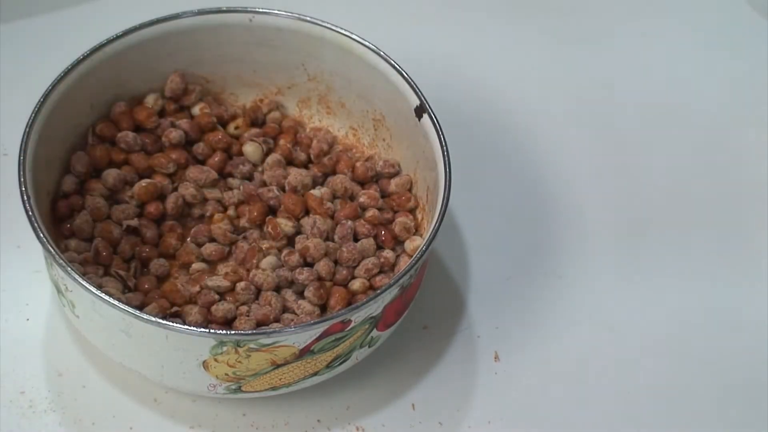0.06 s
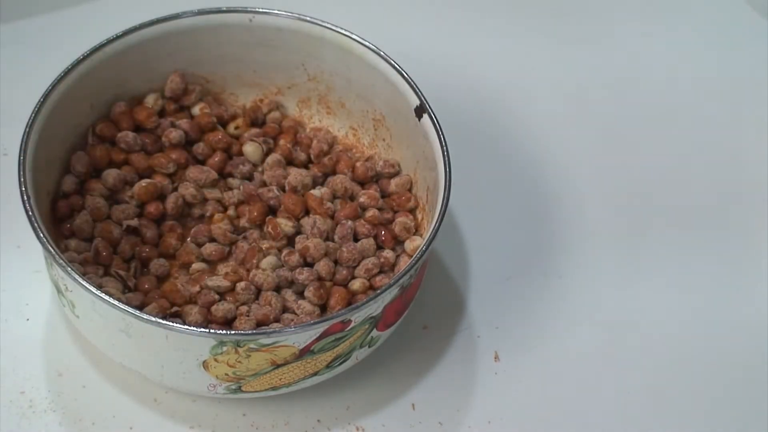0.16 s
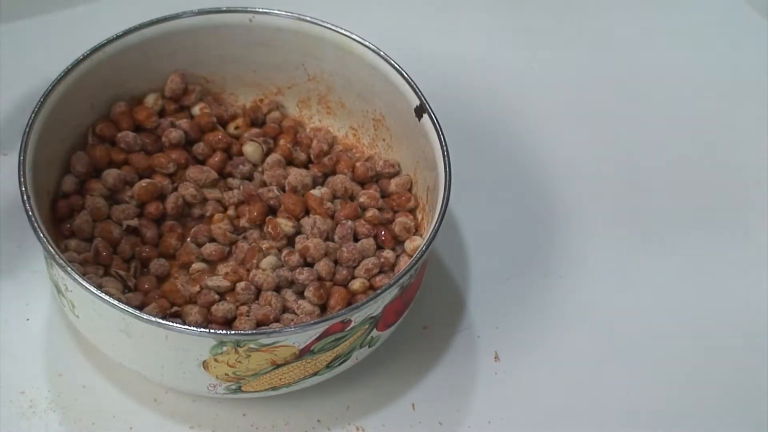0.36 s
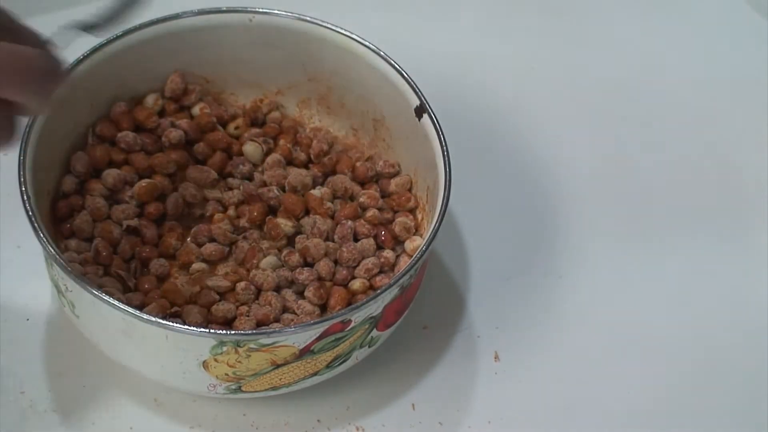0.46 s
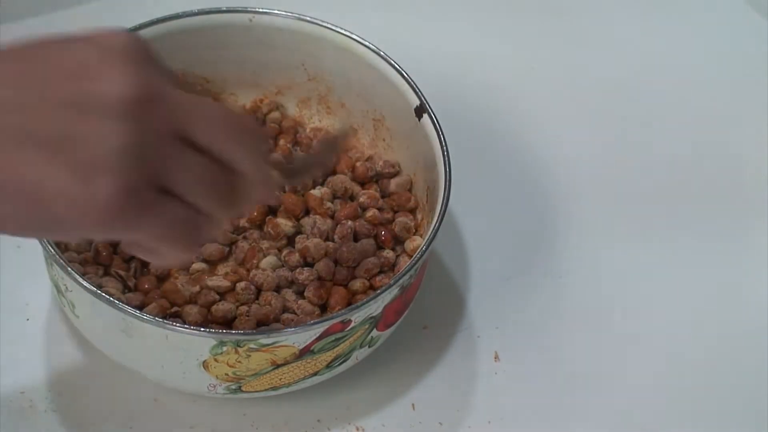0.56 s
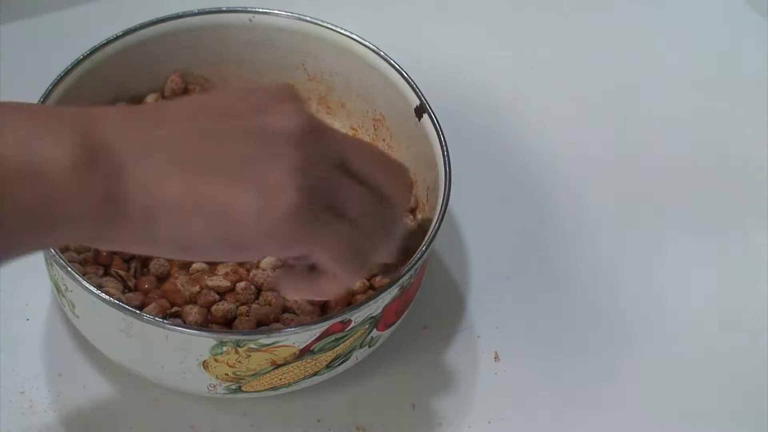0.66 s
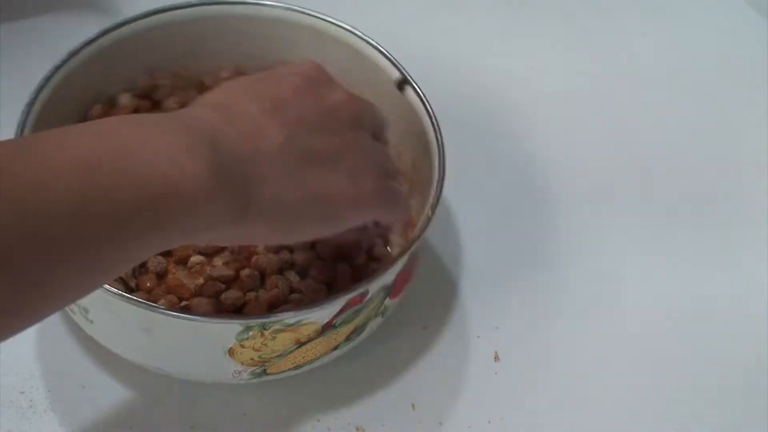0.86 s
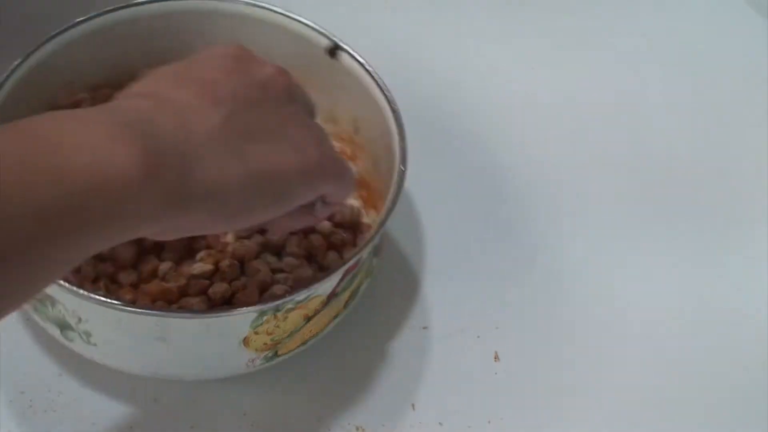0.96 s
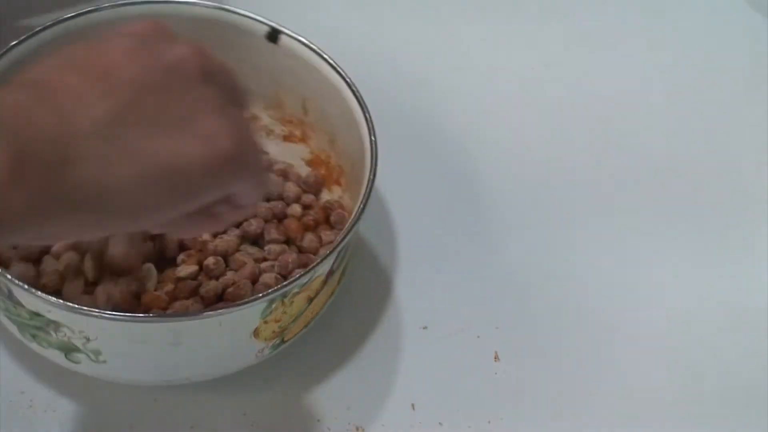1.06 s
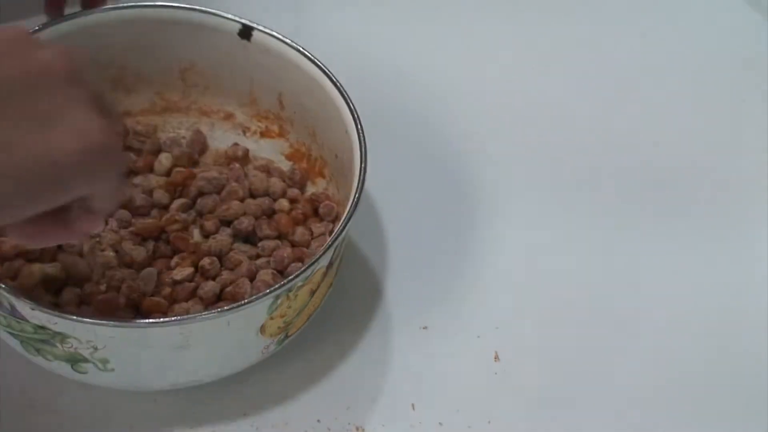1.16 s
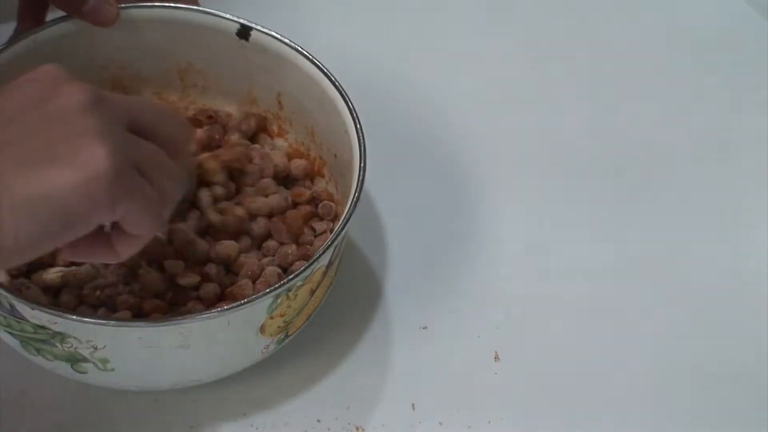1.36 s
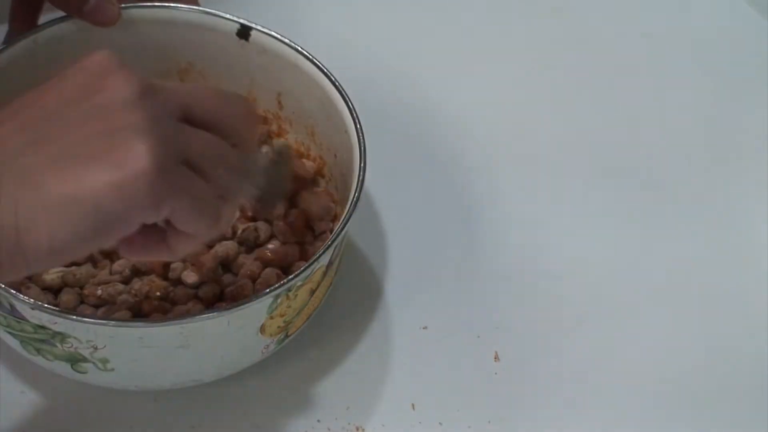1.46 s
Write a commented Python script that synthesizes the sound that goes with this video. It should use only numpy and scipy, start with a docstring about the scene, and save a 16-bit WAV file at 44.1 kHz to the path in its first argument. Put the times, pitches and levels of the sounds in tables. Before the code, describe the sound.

Loud drawer slam and cutlery rattle, followed by two quieter strokes of a spoon through coated peanuts

```python
"""A kitchen drawer bangs shut, bounces and shudders: short bursts of coloured noise over a shaking rumble.
Before and around the bang its cutlery clinks: ringing tones with a noisy rattle of the neighbours.
Then a spoon ploughs twice through coated peanuts in an enamelled bowl: crowds of tiny clicks and hiss.
The bowl drags on the table top (noise through hum resonances), the spoon touches it (ringing tones)
and single nuts tick (short filtered noise). A small hard room answers, over faint room tone."""
import sys
import numpy as np
from scipy import signal
from scipy.fft import rfft, irfft, next_fast_len
from scipy.io import wavfile
from scipy.ndimage import uniform_filter1d, map_coordinates

SR = 44100
rng = np.random.default_rng(int(sys.argv[2]) if len(sys.argv) > 2 else 0)


def transcribe(signal):
    """Save signal, clipped to [-1, 1], as a 16-bit WAV file at the path in sys.argv[1]."""
    frames = np.atleast_2d(signal).T
    limited = np.clip(frames, -1, 1)
    pcm = np.round(limited * 32767).astype(np.int16)
    wavfile.write(sys.argv[1], SR, pcm)


def volts(x):
    """Linear amplitude factor 10**(x/20) for a level x in dB, scalar or array-like."""
    e = np.asarray(x, float) / 20
    return 10 ** e


N = 66150  # length of the scene [samples]
T = np.arange(SR // 4) / SR  # time inside one short sound [s]


def unit(x):
    """Scale to an rms (average strength) of 1."""
    return x / np.sqrt(np.mean(x ** 2) + 1e-20)


def peaked(x):
    """Scale so that the highest peak is 1."""
    return x / np.abs(x).max()


def along(points, hz):
    """Read a value between (frequency [Hz], value) points, on a log frequency axis."""
    f, v = np.transpose(points)
    return np.interp(np.log(hz + 1), np.log(f + 1), v)


def curves(rows):
    """An on/off switch, then one smooth curve for each column after the time."""
    s, *columns = np.transpose(rows)
    t = np.arange(N) / SR
    on = (t >= s[0]) & (t <= s[-1])
    return [on] + [np.interp(t, s, column) for column in columns]


def coloured(x, spectrum):
    """Shape the tone by (frequency [Hz], level [dB]) points, with no sound before its cause."""
    m = 2 * next_fast_len(x.shape[-1])
    gain = volts(along(spectrum, np.fft.rfftfreq(m, 1 / SR))) + 1e-6
    # folding the cepstrum onto positive times makes the filter minimum-phase
    cepstrum = irfft(np.log(gain), m)
    cepstrum[1:m // 2] *= 2
    cepstrum[m // 2 + 1:] = 0
    return irfft(rfft(x, m) * np.exp(rfft(cepstrum)), m)[..., :x.shape[-1]]


def resonant(x, peaks):
    """Pass x twice through (centre [Hz], width of one pass [Hz], level [dB]) resonances: dark valleys."""
    n = len(x)
    f = np.fft.rfftfreq(2 * n, 1 / SR)
    gain = sum(volts(db) * (1j * f * width / (centre * centre - f * f + 1j * f * width)) ** 2
               for centre, width, db in peaks)
    return irfft(rfft(x, 2 * n) * gain)[:n]


def wobble(rate, size=N):
    """A smooth random curve with this many random points a second."""
    points = rng.standard_normal(int(size * rate / SR) + 4)
    return map_coordinates(points, [np.arange(size) * rate / SR])


def add(track, s, sound):
    """Mix a sound into the track at time s [s]."""
    i = max(round(s * SR), 0)
    track[..., i:i + sound.shape[-1]] += sound[..., :N - i]


# How wide spread-out sound is, difference of the ears over their middle: (frequency [Hz], level [dB])
ROOM_WIDTH = [(100, -13), (600, -9.5), (1200, -7), (4000, -7.5), (9000, 0), (12000, -15)]


def diffuse(mid, side):
    """Sound from all around: left and right are made from two unrelated signals."""
    side = coloured(side, ROOM_WIDTH)
    return np.array([mid + side, mid - side])


# How long the small hard room takes to fade by 60 dB: (frequency [Hz], fade time [s])
ROOM_FADE = [(150, 0.2), (1000, 0.38), (4000, 0.3), (12000, 0.22)]


def roomed(x, wet_db):
    """Direct sound plus a fresh tail of noise, which dies at its own speed in each pitch band."""
    hz, t, z = signal.stft(rng.standard_normal((2, SR * 2 // 3)), SR, nperseg=256)
    fade = volts(-60 * t / along(ROOM_FADE, hz)[:, None])
    tail = signal.istft(z * fade, SR, nperseg=256)[1]
    tail = diffuse(*tail) / np.linalg.norm(tail[0])
    late = np.pad(x, (150, 0))  # the tail waits 150 samples
    wet = signal.fftconvolve(late[None], tail, axes=1)
    return volts(wet_db) * wet + np.pad(x, (0, wet.shape[1] - len(x)))


def ring(modes, uneven_db, rate):
    """Tones of a struck metal piece start together; loose contact with neighbours makes them waver."""
    depth, faster_above_hz, rise_s = 1.3, 5000, 0.001

    def sway(hz):
        return depth * wobble(rate * max(1, hz / faster_above_hz), size=len(T))

    out = np.zeros(len(T))
    for hz, db, t60 in modes:
        fade = volts(db + uneven_db * rng.normal() - 60 * T / t60)
        phase = 2 * np.pi * hz * T
        out += fade * ((1 + sway(hz)) * np.sin(phase) + sway(hz) * np.cos(phase))
    return out * (1 - np.exp(-T / rise_s))


def burst(spectrum, t60):
    """Noise that fades by 60 dB in t60 [s], then is coloured and scaled to peak 1."""
    return peaked(coloured(rng.standard_normal(len(T)) * volts(-60 * T / t60), spectrum))


# Tone colour of the faint room tone: (frequency [Hz], level [dB])
ROOM_TONE = [(18, -76), (30, -16.5), (286, -4), (446, -1), (953, -4), (1060, -3.5), (1980, -9.5),
             (3020, -15), (8380, -28), (15700, -30)]


def room_tone():
    """Steady coloured noise from all around, under everything else."""
    return volts(-61) * diffuse(*unit(coloured(rng.standard_normal((2, N)), ROOM_TONE)))


# Ringing tones of each piece of cutlery: (frequency [Hz], level [dB], time to fade 60 dB [s])
FORK_TONES = [(1811, -1, 0.069), (3170, -16, 0.12), (5640, -7.5, 0.18), (6556, 3, 0.039),
              (10020, -16, 0.056), (11200, -30, 0.093)]
SPOON_TONES = [(2302, -5, 0.14), (3370, -15.5, 0.18), (3626, -15, 0.26), (3784, -14.5, 0.15),
               (5728, -4.5, 0.13), (6293, -7.5, 0.15), (6350, -5.5, 0.037), (10800, -32.5, 0.026),
               (11730, -44, 0.065)]
KNIFE_TONES = [(4850, 8.5, 0.054), (5730, 12, 0.098), (8150, 3.5, 0.064), (9000, 10, 0.091),
               (11030, -10.5, 0.039), (12150, -2, 0.087), (12960, 6.5, 0.07)]
# Clinks of each piece: (time [s], level of the ring [dB], level of the rattle among neighbours [dB])
FORK_CLINKS = [(0.1344, -23.5, -23), (0.1404, -31, -26), (0.1456, -35, -31), (0.166, -40, -33.5),
               (0.212, -36.5, -25.5), (0.2975, -37, -44)]
SPOON_CLINKS = [(.001, -38.5, -29), (.056, -44, -55), (.1348, -29.5, -43.5), (.176, -50.5, -36),
                (.2115, -31.5, -23.5), (.222, -46, -26.5), (.262, -32, -26), (.2965, -37.5, -42)]
KNIFE_CLINKS = [(0.093, -53, -54), (0.127, -49, -40)]
# Tone colour of the rattle in a clink: (frequency [Hz], level [dB])
CLINK_RATTLE = [(800, -77), (1300, -22), (1700, -4), (3500, 1.5), (5000, -2), (6500, 2), (7500, -15.5),
                (11000, -14.5), (13500, -28), (15800, -27)]


def cutlery():
    """Every clink rings its piece in its own tones and rattles its neighbours as a burst of noise."""
    out = np.zeros((2, N))
    pieces = (FORK_TONES, FORK_CLINKS), (SPOON_TONES, SPOON_CLINKS), (KNIFE_TONES, KNIFE_CLINKS)
    for tones, clinks in pieces:
        for s, ring_db, rattle_db in clinks:
            ringing = volts(ring_db) * ring(tones, uneven_db=0.5, rate=170)
            rattle = volts(rattle_db) * burst(CLINK_RATTLE, t60=0.087)
            add(out, s, roomed(ringing + rattle, wet_db=-3))
    return out


# The first hard contact, one row: (time [s], peak level [dB], time to fade 60 dB [s])
FIRST_SNAP = (.2858, -1.5, 0.004)
# The drawer meets its stop: (time [s], peak level [dB], time to fade 60 dB [s])
STOP_BANGS = [(.2872, -4.5, 0.037)]
# Duller rebounds: (time [s], peak level [dB], time to fade 60 dB [s])
REBOUNDS = [(.4288, -14.5, 0.037), (.4345, -15.5, 0.0034), (.4435, -16, 0.03)]
# Tone colours of the snap, the bang and the rebounds: (frequency [Hz], level [dB])
SNAP_TONE = [(100, -50), (500, -12), (2500, 0), (4800, 0), (6500, -22), (12000, -51)]
BANG_TONE = [(60, -50.5), (130, -21.5), (200, -4.5), (400, 1.5), (700, -8.5), (1600, -7.5), (3500, -11),
             (5000, -42), (6500, -49), (14000, -58)]
REBOUND_TONE = [(60, -40), (230, 0), (900, 4), (1400, -3), (2200, -20), (5000, -43), (10000, -60)]
# How strongly the cabinet shakes: (time [s], level [dB])
CABINET_SHUDDER = [(.288, -17.5), (.3, -16), (.312, -22.5), (.36, -25.5), (.427, -35), (.445, -30),
                   (.51, -37.5), (.53, -42.5), (.6, -58), (.68, -69.5)]
# Tone colours of the shaking cabinet and its thin panels: (frequency [Hz], level [dB])
CABINET_TONE = [(35, -99), (60, -30), (251, -10.5), (428, -5.5), (606, -10), (686, -3), (1030, -3.5),
                (1650, -2), (8000, -55.5), (10400, -108)]
PANEL_TONE = [(900, -42), (1700, 10.5), (3200, -4.5), (6000, -36.5), (7500, -81)]


def drawer():
    """A snap, a bang and dull rebounds, while the cabinet shudders unevenly and its panels buzz."""
    def shake(spectrum):
        return diffuse(*unit(coloured(rng.standard_normal((2, N)), spectrum)))

    on, cabinet_db = curves(CABINET_SHUDDER)
    since_start = np.arange(N) / SR - CABINET_SHUDDER[0][0]
    buzz_db = -22.5 - 60 * since_start / 0.47  # the buzz fades by 60 dB in 0.47 s
    uneven = on * volts(0.87 * wobble(62.5))
    out = uneven * (volts(cabinet_db) * shake(CABINET_TONE) + volts(buzz_db) * shake(PANEL_TONE))
    knocks = ([FIRST_SNAP], SNAP_TONE), (STOP_BANGS, BANG_TONE), (REBOUNDS, REBOUND_TONE)
    for hits, spectrum in knocks:
        for s, db, t60 in hits:
            add(out, s, volts(db) * roomed(burst(spectrum, t60), wet_db=-9))
    return out


# The bowl slides on the table: (time [s], level of the low hum [dB], level of the higher hum [dB])
BOWL_DRAG = [(.736, -68, -64), (.745, -58, -58), (.785, -51.5, -57), (.808, -63, -56), (.83, -59, -46),
             (.87, -56, -50), (.918, -48.5, -43), (.935, -58, -55), (.966, -47.5, -37),
             (1.09, -51.5, -39.5), (1.11, -58, -47.5), (1.186, -64, -50.5), (1.215, -61, -65),
             (1.238, -44, -55.5), (1.272, -45, -66), (1.295, -52.5, -54.5), (1.335, -57, -65.5),
             (1.5, -74, -65)]
# Hums of the table top: (centre [Hz], width of one filter pass [Hz], level [dB])
LOW_HUM = [(176.3, 71, 0.62), (219.2, 34, -1.6)]
HIGH_HUM = [(288.7, 27, 2), (366.5, 29.6, 1), (422.3, 48, -6), (520, 115, -10), (790, 530, -10.5)]


def drag():
    """The bowl's foot slips in small lumps and keeps every hum of the table top fed."""
    def even(x):
        power = uniform_filter1d(x ** 2, round(0.02 * SR))  # averaged over 0.02 s
        return unit(x / np.abs(power) ** .45)  # evens out most of the ups and downs

    def fed(peaks):
        hums = (volts(db) * even(resonant(rng.standard_normal(N), [(hz, width, 0)]))
                for hz, width, db in peaks)
        return unit(sum(hums))

    on, low_db, high_db = curves(BOWL_DRAG)
    lumps = on * volts(1.5 * wobble(70))
    hum = volts(low_db) * fed(LOW_HUM) + volts(high_db) * fed(HIGH_HUM)
    return roomed(lumps * hum, wet_db=-12)[:, :N]


def grains(spectrum):
    """Dense tiny collisions of unequal size and pitch, on a fine hiss."""
    clicks_per_s, spread_db, sharpness, hiss_share = 900, 4.5, 2.5, .35  # sharpness: centre over width

    def clicks():
        happens = rng.random(N) < clicks_per_s / SR
        return happens * volts(spread_db * rng.standard_normal(N)) * rng.choice([-1, 1], N)

    # nuts and crumbs of all sizes: twelve pitches, each with its own clicks
    pings = sum(resonant(clicks(), [(hz, hz / sharpness, 0)]) for hz in np.geomspace(500, 14000, 12))
    hiss = rng.standard_normal(N)
    mix = np.sqrt(1 - hiss_share) * unit(pings) + np.sqrt(hiss_share) * hiss
    return unit(coloured(mix, spectrum))


# Two strokes of the spoon: (time [s], level of the low rattle [dB], level of the bright rustle [dB])
STROKES = [(.738, -89, -67.5), (.75, -70, -68.5), (.8, -67.5, -56.5), (.88, -60, -48.5), (.89, -54, -44),
           (.915, -40.5, -43), (.93, -44.5, -44), (.98, -37, -36.5), (1.0, -38, -33.5),
           (1.04, -37.5, -41.5), (1.08, -42, -44), (1.15, -48.5, -47.5), (1.2, -68, -65), (1.245, -57, -85),
           (1.255, -48.5, -45.5), (1.285, -84.5, -58.5), (1.3, -59, -38), (1.31, -43, -33.5),
           (1.33, -50, -43), (1.37, -57, -42), (1.41, -52, -54.5), (1.44, -66, -88), (1.5, -70, -81)]
# Tone colours of the low rattle and the bright rustle: (frequency [Hz], level [dB])
LOW_RATTLE = [(410, -7.5), (700, -8.5), (985, -13), (1160, -36), (1310, -2.5), (1460, -11), (2080, -2),
              (2800, -3), (6000, -10.5), (7800, -19), (13200, -120)]
BRIGHT_RUSTLE = [(1470, -38), (2500, -29), (2940, -14), (3510, -1.5), (3790, -2), (6490, 4.5),
                 (11900, -0.5), (15700, -15)]


def nuts():
    """The spoon pushes the heap: many small collisions make a rattle and a brighter rustle."""
    on, low_db, high_db = curves(STROKES)
    rattle = volts(low_db + 0.67 * wobble(68.7)) * grains(LOW_RATTLE)
    rustle = volts(high_db + 1.0 * wobble(91.2)) * grains(BRIGHT_RUSTLE)
    return roomed(on * (rattle + rustle), wet_db=-7)[:, :N]


# The spoon touches the bowl: (time [s], level [dB])
SPOON_TOUCHES = [(0.7393, -56), (0.75, -49.5), (.769, -51), (.79, -61.5), (.81, -54.5), (1.226, -66)]
# Ringing tones of the bowl: (frequency [Hz], level [dB], time to fade 60 dB [s])
BOWL_TONES = [(6510, 2, 0.055), (6760, 2.5, 0.078), (8360, -8, .06), (9060, -6, 0.22), (9750, -4, 0.094),
              (11600, -14, 0.12), (13100, -14, 0.2)]
# Tone colour of the hiss of a sliding touch: (frequency [Hz], level [dB])
SLIDE_HISS = [(4500, -48), (6300, 2.5), (13500, -2), (15800, -15)]


def bowl_touches():
    """Light sliding touches ring the bowl; the sliding blurs the ring and adds a hiss."""
    out = np.zeros((2, N))
    for s, db in SPOON_TOUCHES:
        ringing = ring(BOWL_TONES, uneven_db=2, rate=130)
        hiss = volts(11) * burst(SLIDE_HISS, t60=0.25)
        add(out, s, volts(db) * roomed(ringing + hiss, wet_db=-12))
    return out


# Single nuts: (time [s], level [dB], body pitch [Hz], snap pitch [Hz], snap level over the body [dB])
NUT_TICKS = [(0.832, -46.5, 1390, 3400, -4), (.912, -32.5, 1500, 3220, -1.5), (0.987, -20, 2150, 4930, 3.5),
             (0.9846, -25, 9000, 12200, -2), (1.2507, -34.5, 2310, 9100, 3.5),
             (1.258, -33.5, 6950, 10200, 0.5), (1.2941, -30, 3570, 4850, -12),
             (1.3023, -27.5, 4220, 9000, 2.5), (1.305, -33, 5700, 11400, 4), (1.311, -33, 2736, 8500, -7),
             (1.4081, -30.5, 1475, 4200, -2.5), (1.4085, -39.5, 650, 6500, 9.5),
             (1.4552, -42, 653, 3960, 5.5)]


def nut_ticks():
    """Short hollow ticks: a sharp contact and fading noise excite a body pitch and a snap pitch."""
    fade_s, sharpness, first_contact = 0.012, 3.5, 5  # 60 dB fade; centre over width; over the noise
    out = np.zeros((2, N))
    for s, db, body_hz, snap_hz, snap_db in NUT_TICKS:
        blow = np.r_[first_contact, rng.standard_normal(len(T) - 1)] * volts(-60 * T / fade_s)
        body = peaked(resonant(blow, [(body_hz, body_hz / sharpness, 0)]))
        snap = peaked(resonant(blow, [(snap_hz, snap_hz / sharpness, 0)]))
        add(out, s, volts(db) * roomed(body + volts(snap_db) * snap, wet_db=-12))
    return out


def scene():
    """All the sounds of the kitchen together."""
    return room_tone() + cutlery() + drawer() + drag() + nuts() + bowl_touches() + nut_ticks()


# Left microphone over the right one: (frequency [Hz], level [dB])
LEFT_OVER_RIGHT = [(100, 4.5), (500, 4), (2500, 1), (9000, 2), (13000, -2)]
# Overall tone, deep bass softened and nothing above about 15.9 kHz: (frequency [Hz], level [dB])
OVERALL_TONE = [(20, -30), (60, -10), (120, 0), (15800, 0), (15950, -60)]


def microphones(dry):
    """Both lose deep bass; the left is more sensitive, except in the high treble."""
    left = coloured(dry[0], [(hz, db / 2) for hz, db in LEFT_OVER_RIGHT])
    right = coloured(dry[1], [(hz, -db / 2) for hz, db in LEFT_OVER_RIGHT])
    return coloured(np.array([left, right]), OVERALL_TONE)


def roll_off(x):
    """The treble ends steeply here."""
    return signal.sosfilt(signal.butter(12, 15870, fs=SR, output="sos"), x)


def record(dry):
    """The two microphones pick up the scene."""
    mix = microphones(dry)
    return roll_off(mix)


dry = scene()
out = record(dry)
transcribe(out)
```